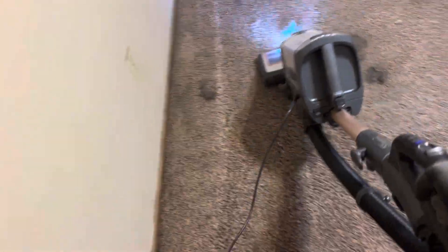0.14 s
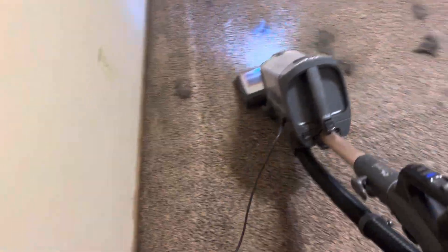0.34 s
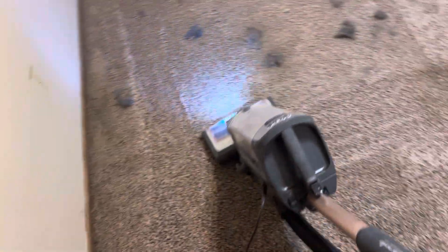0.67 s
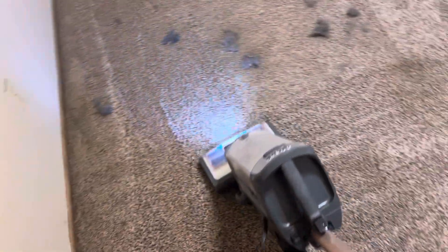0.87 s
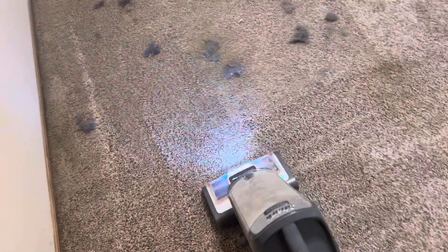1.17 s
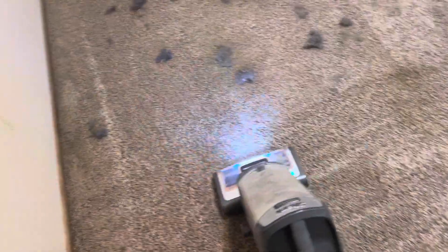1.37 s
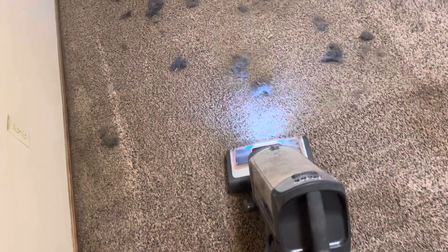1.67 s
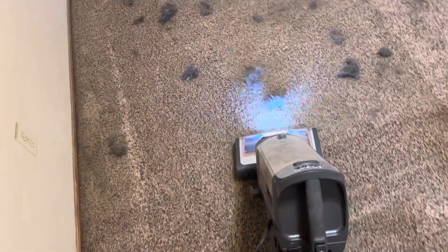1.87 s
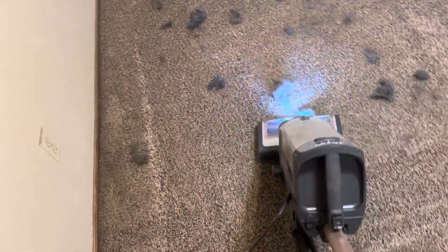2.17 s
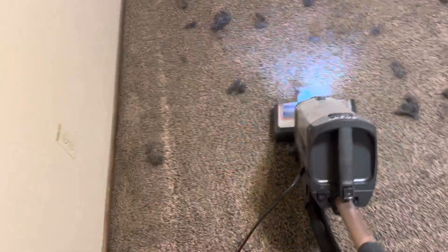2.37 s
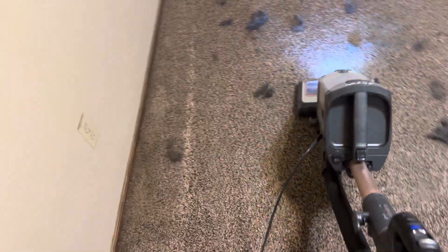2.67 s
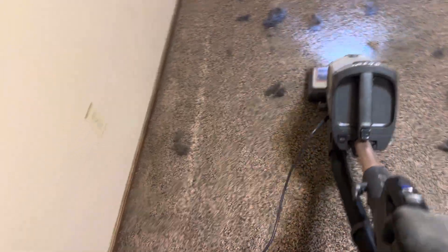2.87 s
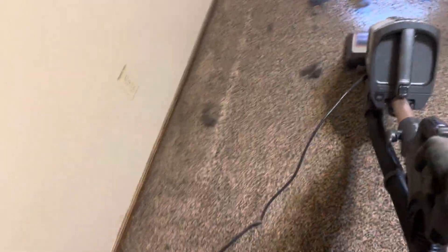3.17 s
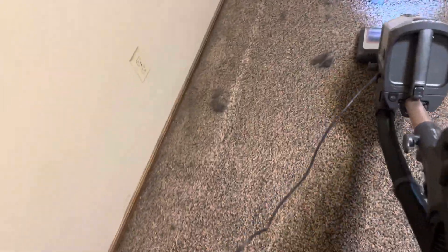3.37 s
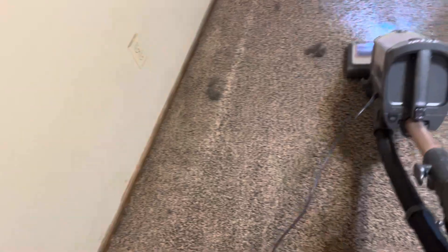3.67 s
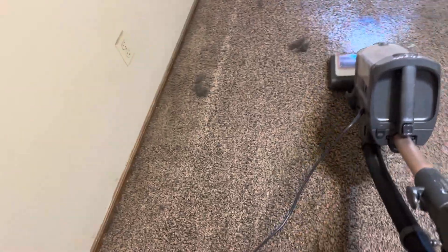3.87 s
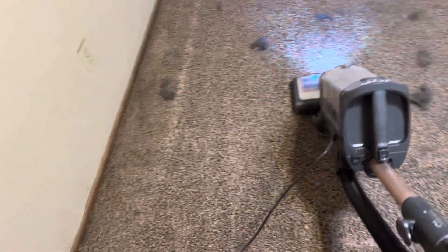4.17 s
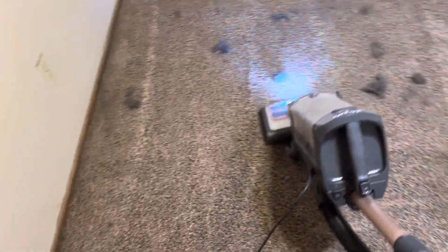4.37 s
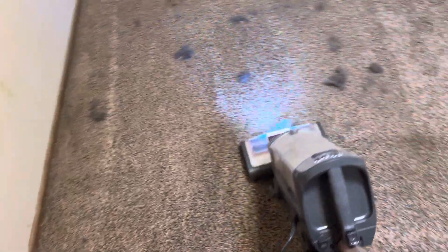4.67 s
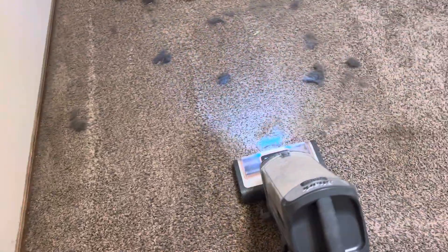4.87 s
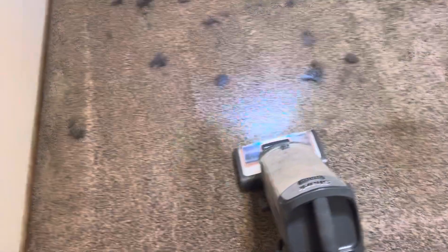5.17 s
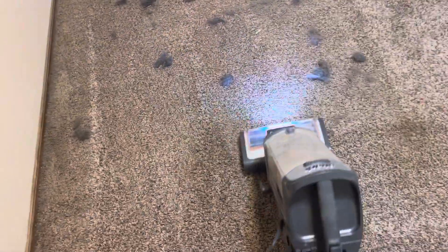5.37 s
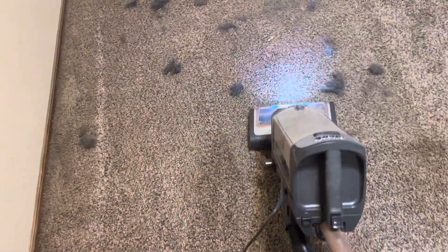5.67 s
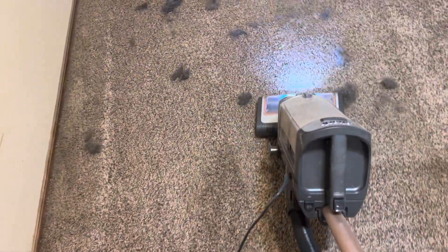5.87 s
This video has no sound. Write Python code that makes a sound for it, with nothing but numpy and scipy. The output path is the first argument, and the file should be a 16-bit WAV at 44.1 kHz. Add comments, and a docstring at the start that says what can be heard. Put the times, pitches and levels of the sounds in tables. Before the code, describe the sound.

An upright vacuum cleaner runs without pause in a carpeted room, heard close from above the handle. Its motor howls on one swelling, fading note under a thin whine. Air rumbles and rushes, the brush roll thrums and beats more firmly during two forward pushes, and grit ticks in the duct. Near the middle the exhaust swings round and the hiss becomes brighter and louder, then eases.

```python
"""In a carpeted room, an upright vacuum cleaner is pushed to and fro, heard from just above its handle.
The motor howls on one note that swells and fades, with a thin whine above it and a faint hum below.
The brush roll drones, thrums and beats the carpet: tones locked to its speed. Grit ticks in the duct.
Air rumbles, rushes and hisses as coloured noise, and blows fuzzy notes in the hollow parts.
The strokes of the arm and one swing of the exhaust towards the listener shape the levels."""
import sys
import numpy as np
from scipy import signal
from scipy.fft import next_fast_len
from scipy.io import wavfile
from scipy.ndimage import uniform_filter1d

SR = 44100
rng = np.random.default_rng(int(sys.argv[2]) if len(sys.argv) > 2 else 0)


def to_wav(sig):
    """Store sig (one row per channel, or 1-D mono) as 16-bit WAV at the path in sys.argv[1].

    Samples outside -1..1 are clipped; the rate is SR.
    """
    pcm = np.clip(np.atleast_2d(sig), -1, 1) * 32767
    pcm = np.round(pcm).astype(np.int16)
    wavfile.write(sys.argv[1], SR, pcm.T)  # frames by channels


N = 265923  # length in samples
TIME = np.arange(N) / SR  # seconds


def gain_of(db):
    """Turns decibels into an amplitude factor."""
    return 10 ** (np.asarray(db) / 20)


def evened(x):
    """Scales a signal to an rms of one."""
    return x / np.sqrt(np.mean(abs(x) ** 2) + 1e-20)


def read(points, hz):
    """Reads a table over frequency, joining its points along a log-frequency axis."""
    point_hz, value = np.transpose(points)
    return np.interp(np.log(hz + 1), np.log(point_hz + 1), value)


def curves(rows):
    """Joins the rows of a time table with straight lines: one curve for each column after the time."""
    s, *columns = np.transpose(rows)
    return [np.interp(TIME, s, column) for column in columns]


def swells_db(rows):
    """Adds up brief bell-shaped swells and dips of a level; at the half width a bell is down to 37 %."""
    return sum(db * np.exp(-((TIME - s) / half_width) ** 2) for s, half_width, db in rows)


def angle_of(hz):
    """The running angle, in radians, of something that turns hz times a second."""
    return 2 * np.pi * np.cumsum(hz) / SR


def flutter(width_hz):
    """Slow complex randomness of unit rms, about width_hz wide: a wider band flutters faster."""
    size = next_fast_len(N)
    spectrum = rng.standard_normal(size) + 1j * rng.standard_normal(size)
    hz = np.fft.fftfreq(size, 1 / SR)
    narrowed = spectrum / (1 + (2 * hz / width_hz) ** 2)
    return evened(np.fft.ifft(narrowed)[:N])


def partial(angle, width_hz, steady):
    """A stereo tone: a steady direct part, plus a part that flutters differently left and right."""
    steady = np.clip(steady, 0, 1)
    scattered = np.array([flutter(width_hz), flutter(width_hz)])
    envelope = np.sqrt(steady) + np.sqrt(1 - steady) * scattered
    return np.sqrt(2) * (envelope * np.exp(1j * angle)).real


def patches(shape, frames, bins):
    """A smooth random field of unit rms over frequency and time."""
    field = rng.standard_normal(shape)
    field = uniform_filter1d(field, bins, axis=0)
    return evened(uniform_filter1d(field, frames, axis=1))


# How alike the air sounds left and right. Each row: frequency in Hz, likeness from 0 to 1.
LIKENESS = [(100, .98), (350, .7), (750, .65), (950, .4), (1450, .25), (2000, .5), (2400, .88), (3000, .62),
            (5200, .42), (6400, .5), (7200, .88), (15000, .88)]
# How far the left channel runs ahead of the right. Each row: frequency in Hz, lead in radians.
LEAD = [(100, 0), (800, 0), (1050, .8), (1250, .3), (1550, -3.4), (2000, -4.9), (2250, -6.3), (3000, -7),
        (5100, -7), (5500, -4), (6900, -3.2), (9500, 0), (12600, 3.1), (15600, 6.3)]
# How much louder the left channel is. Each row: frequency in Hz, left minus right in dB.
BALANCE_DB = [(70, 1), (300, -2), (1100, -1.5), (1800, 2), (2500, 0), (3500, -1.8), (5000, -4),
              (6400, -3.5), (7200, 0), (15000, 0)]


def turbulence(colour, patchy_db, drift_db, streak_db=0, size=1024):
    """Stereo coloured noise of unit rms, with quick eddies, slow drift and narrow passing resonances."""
    overlap = size * 3 // 4
    hz, _, (a, b) = signal.stft(rng.standard_normal((2, N)), SR, nperseg=size, noverlap=overlap)
    hz = hz[:, None]
    same = np.clip(read(LIKENESS, hz), 0, 1)
    side_gain = gain_of(read(BALANCE_DB, hz) / 2)
    left = a * np.exp(1j * read(LEAD, hz)) * side_gain
    right = (same * a + np.sqrt(1 - same ** 2) * b) / side_gain
    eddies = patches(a.shape, frames=14, bins=10)
    drift = patches(a.shape, frames=120, bins=3)
    streaks = patches(a.shape, frames=20, bins=1)
    level_db = read(colour, hz) + patchy_db * eddies + drift_db * drift + streak_db * streaks
    field = np.array([left, right]) * gain_of(level_db)
    noise = signal.istft(field, nperseg=size, noverlap=overlap)[1]
    return evened(noise[:, :N])


def cavity(hz, db, width_hz):
    """Air sucked past a cavity blows it like a wide bottle: a fuzzy note."""
    note = flutter(width_hz) * np.exp(1j * angle_of(hz))
    return gain_of(db) * evened(note.real)


# The arm's strokes, one row for each turning point. Each row: time in seconds,
# reach from 0 at the feet to 1 at arm's length, push from 0 to 1 of the stroke that starts here.
STROKES = [(0, 0.54, 0), (1.25, 0.014, 0.75), (3.382, 0.96, 0), (5.12, 0.021, 1), (6.4, 0.45, 0)]
TURN_S = 0.093  # the nozzle takes this long to bed in or ease off after a turn


def strokes():
    """Reach, easing from one turning point to the next, and how firmly the nozzle is pushed."""
    s, reach, push = np.transpose(STROKES)
    points = np.arange(len(s))
    leg = np.interp(TIME, s, points)
    eased = np.floor(leg) + (1 - np.cos(np.pi * (leg % 1))) / 2
    firmness = uniform_filter1d(push[leg.astype(int)], round(TURN_S * SR))
    return np.interp(eased, points, reach), firmness


def stroke_db(law):
    """The level of a sound that depends on the reach and on the push."""
    close_db, reach_db, push_db = law
    reach, push = strokes()
    return close_db + reach_db * reach + push_db * push


FACING_S, SWING_IN_S, SWING_OUT_S, SWING_SHARPNESS = 2.95, 0.64, 0.83, 2.7


def facing():
    """How squarely the exhaust faces the listener (0-1): a quick swing in, then a slower turn away."""
    t = TIME - FACING_S
    swing_in = np.exp(-abs(t / SWING_IN_S) ** SWING_SHARPNESS)
    turn_away = np.exp(-abs(t) / SWING_OUT_S)
    return np.where(t < 0, swing_in, turn_away)


# The brush roll's speed; it slows where it digs into the pile.
# Each row: time in seconds, turns per second.
BRUSH_SPEED = [(0, 75.5), (1.1, 78), (1.3, 72), (1.55, 69), (1.9, 70.3), (2.15, 70), (2.4, 73), (2.7, 74.2),
               (3.15, 72.7), (3.9, 71.5), (4.6, 74.5), (5, 74.5), (5.2, 70.4), (5.55, 69.8), (6.03, 70.6)]
SKIM_HZ, SETTLE_S = 74, 0.67  # faster than this the roll skims the pile; averaging time in seconds


def brush_speed():
    """Turns per second of the brush roll, which sets the pitch of all its tones."""
    return curves(BRUSH_SPEED)[0]


def skimming():
    """By how many turns a second the roll runs free as it loses its grip on the pile."""
    return uniform_filter1d(np.maximum(brush_speed() - SKIM_HZ, 0), round(SETTLE_S * SR))


# Swells of the hum. Each row: time in seconds, half width in seconds, change in dB.
MAINS_SWELLS = [(.48, .11, 10), (.85, .08, 8), (2.55, 0.16, 10.4), (4.42, .1, 6.7)]
MAINS_HZ, MAINS_DB = 118.4, -61  # level between the swells


def mains_hum():
    """Faint mains hum: one low sine, alike on both sides."""
    level_db = MAINS_DB + swells_db(MAINS_SWELLS)
    return gain_of(level_db) * np.sqrt(2) * np.cos(2 * np.pi * MAINS_HZ * TIME)


# Crumbs striking the plastic duct. Each row: time in seconds, strength in dB.
CRUMBS = [(.547, -37), (.574, -33), (.69, -34), (.795, -36), (1.279, -35), (1.493, -36), (2.318, -33),
          (2.571, -31), (3.544, -32), (3.597, -32), (3.613, -30), (3.864, -30), (4.474, -30), (4.485, -34),
          (4.656, -34), (4.674, -33), (5.205, -32), (5.792, -35)]
# Colour of the ticks. Each row: frequency in Hz, dB per Hz.
CRUMB_COLOUR = [(1000, -25), (4000, -8), (9000, -3), (13500, 1), (16000, 0)]
SAND_PER_S, SAND_DB, SAND_SPREAD_DB = 60, -67.0, 4.5  # grains a second, smallest grain, spread of sizes


def grit():
    """Sand and larger crumbs tick in the duct: noise bursts that each die within milliseconds."""
    extra_db = SAND_SPREAD_DB * np.minimum(rng.exponential(1, N), 3)
    strikes = gain_of(SAND_DB + extra_db) * (rng.random(N) < SAND_PER_S / SR)
    for s, db in CRUMBS:
        strikes[round(s * SR)] += gain_of(db)
    decay = np.exp(-1 / (.003 * SR))  # a time constant of 3 ms
    ring = signal.lfilter([1], [1, -decay], strikes)
    return ring * turbulence(CRUMB_COLOUR, patchy_db=2, drift_db=0)


# Swells of the bin's note. Each row: time in seconds, half width in seconds, change in dB.
BIN_SWELLS = [(4.1, 0.56, 10.5), (5.75, 0.31, 10.4)]
BIN_HZ, BIN_DB = 245.4, -54  # level before swells and stereo balance


def dust_bin():
    """A low hollow note, as of the dust bin, blown by the air and alike on both sides."""
    note = cavity(np.full(N, BIN_HZ), BIN_DB + swells_db(BIN_SWELLS), width_hz=33.0)
    return note * gain_of([[-1.7], [.7]])


# The nozzle's note drops out or flares. Each row: time in seconds, half width in seconds, change in dB.
NOZZLE_SWELLS = [(.75, 0.16, 6.5), (2.35, 0.088, -7), (3.52, 0.27, -4.5), (4.2, 0.15, -11), (4.72, 0.45, 3),
                 (5.58, 0.19, -9), (5.84, 0.083, 8)]
NOZZLE_HZ, NOZZLE_SHIFT_HZ = 334.3, 33.26  # pitch when pulled in close, and its rise at full reach
NOZZLE_DB = -39  # before swells and stereo balance


def nozzle():
    """The nozzle's hollow note rises with the reach and is alike on both sides."""
    reach, _ = strokes()
    hz = NOZZLE_HZ + NOZZLE_SHIFT_HZ * reach
    note = cavity(hz, NOZZLE_DB + swells_db(NOZZLE_SWELLS), width_hz=28.5)
    return note * gain_of([[-1.7], [.7]])


# The duct's moan. Each row: time in seconds, pitch in Hz, level in dB before stereo balance.
DUCT = [(0, 1000, -46), (.35, 965, -38), (.7, 1020, -44.5), (1.1, 1045, -41), (2.2, 1070, -45.5),
        (2.8, 955, -53), (3.6, 945, -39), (4.1, 935, -46.5), (4.8, 1020, -41), (5.3, 1090, -43.5),
        (6.03, 1060, -36.5)]


def duct():
    """The air duct moans on a drifting note, scattered by the room so that left and right differ."""
    hz, db = curves(DUCT)
    moan = np.array([cavity(hz, db, width_hz=55), cavity(hz, db, width_hz=55)])
    return moan * gain_of([[-1], [1]])


# The hose's hoot. Each row: time in seconds, pitch in Hz, level in dB.
HOSE = [(0, 1700, -62), (1, 1790, -42), (1.6, 1680, -54), (2, 1430, -47), (2.5, 1287, -39),
        (2.9, 1294, -66), (4.1, 1458, -51), (4.6, 1730, -43.5), (5.35, 2150, -55), (6.03, 1764, -45)]


def hose():
    """A breathy hoot wanders as the hose flexes, scattered so that left and right differ."""
    hz, db = curves(HOSE)
    return np.array([cavity(hz, db, width_hz=140), cavity(hz, db, width_hz=140)])


# Colour of the nozzle's rumble. Each row: frequency in Hz, dB per Hz.
RUMBLE = [(20, -44), (45, -25), (95, -19), (150, -4), (195, -5.5), (250, -7), (305, 1), (370, 1.5),
          (470, -1), (600, -4), (800, -6.5), (1400, -42), (4000, -77)]
# Level when gripping the pile, change per free turn a second, change when the exhaust faces us.
RUMBLE_DB, RUMBLE_SKIM_DB_PER_HZ, RUMBLE_FACING_DB = -35, -0.6, -3.5


def rumble():
    """Low noise at the nozzle thins when it skims, and when the body swings round and hides it."""
    level_db = RUMBLE_DB + RUMBLE_SKIM_DB_PER_HZ * skimming() + RUMBLE_FACING_DB * facing()
    return gain_of(level_db) * turbulence(RUMBLE, patchy_db=1.0, drift_db=0.5)


# Colour of the rush. Each row: frequency in Hz, dB per Hz.
RUSH = [(300, -27.5), (600, -5.5), (800, -4.5), (1000, 1), (1400, -2), (1850, -2.5), (2250, -7.5),
        (2750, -13.5), (3400, -12.5), (4300, -11), (4900, -19.5), (6200, -13), (8000, -30.5), (15000, -43)]
# Level of the rush. In order: dB when pulled in close, dB more at full reach, dB more at full push.
RUSH_LAW = (-33, -1.87, 0.29)


def rush():
    """Air rushes through the body: noise with passing resonances whose level follows the strokes."""
    noise = turbulence(RUSH, patchy_db=1.2, drift_db=.5, streak_db=2.4, size=2048)
    return gain_of(stroke_db(RUSH_LAW)) * noise


# Colour of the hiss, before its treble is beamed. Each row: frequency in Hz, dB per Hz.
HISS = [(1000, -25), (2700, -7), (4400, -1.5), (6500, -1), (7200, -2), (8000, .5), (10000, 0), (12500, -3),
        (14200, -.5), (16000, -2.5)]
# Level of the hiss. In order: dB when pulled in close, dB more at full reach, dB more at full push.
HISS_LAW = (-41.5, 1, -0.43)
# Small swells of the hiss. Each row: time in seconds, half width in seconds, change in dB.
HISS_SWELLS = [(.1, .35, 0), (4.4, 0.45, 1.2), (5.95, 0.26, 2.5)]
HISS_FACING_DB = 10  # louder by this when the exhaust squarely faces the listener


def exhaust():
    """The vent hisses unsteadily and beams its treble: the louder the hiss, the brighter it is."""
    level_db = stroke_db(HISS_LAW) + HISS_FACING_DB * facing() + swells_db(HISS_SWELLS)
    jet = turbulence(HISS, patchy_db=1.1, drift_db=.35)
    hiss = gain_of(level_db + 0.91 * flutter(width_hz=52).real) * jet
    high_pass = signal.butter(2, 9000, "high", fs=SR, output="sos")
    treble = signal.sosfiltfilt(high_pass, hiss)
    beam_db = .2 * (level_db - level_db.mean())
    return hiss + (gain_of(beam_db) - 1) * treble


def notched(x, hz, depth, width_hz):
    """Cancels a share of the band around the moving frequency hz."""
    turn = np.exp(1j * angle_of(hz))
    r = np.exp(-np.pi * width_hz / SR)
    # shift the band down to zero, smooth it there, and shift it back
    smooth = signal.lfilter([1 - r], [1, -r], x / turn)
    band = 2 * (turn * smooth).real
    return x - np.clip(depth, 0, 1) * band


# A gap in the airy noise slides as the body moves.
# Each row: time in seconds, centre in Hz, depth from 0 to 1.
GAP = [(0, 2260, 0.8), (.9, 2400, 0.14), (1.6, 2490, 0.26), (2.4, 2420, .03), (3.3, 2315, .2),
       (3.9, 2300, .65), (4.6, 2400, 0.1), (5.4, 2399, 0.45), (6.03, 2265, 0.1)]
GAP_WIDTH_HZ = 150


def airflow():
    """Rumble, plus the rush and hiss with a sliding gap cut into both."""
    gap_hz, gap_depth = curves(GAP)
    return rumble() + notched(rush() + exhaust(), gap_hz, gap_depth, GAP_WIDTH_HZ)


# The drone swells and sinks. Each row: time in seconds, half width in seconds, change in dB.
DRONE_SWELLS = [(.15, 0.08, 7), (.65, .3, 5), (1.23, .05, 3), (1.45, 0.1, -5), (1.8, 0.14, -6),
                (2.12, 0.043, -4), (2.35, 0.17, 3), (3.25, 0.2, -3.5), (4.35, 0.18, 2), (4.6, .12, -3),
                (5.6, 0.096, 3.5)]
DRONE_DB, SKIM_DB_PER_HZ = -46, -6  # peak level before swells and balance; change per free turn a second


def drone():
    """The unbalanced roll drones once a turn, and fades when it skims the pile."""
    level_db = DRONE_DB + SKIM_DB_PER_HZ * skimming() + swells_db(DRONE_SWELLS)
    wobble = 1 + 0.2 * flutter(width_hz=15).real
    tone = gain_of(level_db) * wobble * np.cos(angle_of(brush_speed()))
    return tone * gain_of([[.4], [-.4]])


# Level of the thrum. In order: dB when pulled in close, dB more at full reach, dB more at full push.
THRUM_LAW = (-48, -8.5, -3.3)
# It surges or dips briefly. Each row: time in seconds, half width in seconds, change in dB.
THRUM_SURGES = [(.36, 0.079, 5), (.72, 0.1, -7), (1.17, 0.09, 5), (1.43, 0.1, -13), (1.88, .17, 3.5),
                (2.36, .07, -5), (2.58, .08, 10), (4.32, 0.12, 4.5), (4.82, .08, 0), (5.08, 0.16, 3)]


def thrum():
    """The roll's two bristle rows thrum twice a turn."""
    level_db = stroke_db(THRUM_LAW) + swells_db(THRUM_SURGES)
    return gain_of(level_db) * partial(2 * angle_of(brush_speed()), width_hz=6.7, steady=0.93)


# Level of the whole beat before stereo balance.
# In order: dB when pulled in close, dB more at full reach, dB more at full push.
BEAT_LAW = (-52.5, 0.78, 12.5)
# Harmonics of the beat. Each row: multiple of the brush speed, dB relative to the beat's level.
BEAT = [(3, -12), (4, -4.5), (5, -4.5), (6, .7), (7, -12), (8, -9), (12, -14), (13, -12), (15, -13)]
# Single harmonics swell and sink.
# Each row: multiple of the brush speed, time in seconds, half width in seconds, change in dB.
BEAT_SWELLS = [(3, 3.1, .7, 4), (4, 1.6, .35, 3.5), (4, 2.8, .14, -9), (4, 3.85, .3, 10),
               (4, 5.3, .17, 5.5), (4, 5.95, .25, -12), (5, 2.9, .3, 4), (5, 4.95, .15, 12),
               (5, 5.4, .25, -6), (6, 1.55, .25, -3), (6, 2.55, .12, 1.5), (6, 3.02, .12, 4),
               (6, 3.47, .1, -10), (6, 5.25, .15, 2), (6, 5.72, .14, 4.5), (7, 2.45, .25, 6),
               (7, 2.95, .15, 5), (8, 3.15, .25, 7), (13, 3.1, .35, 5)]


def bristle_beat():
    """The bristles beat the pile unevenly: harmonics of the brush speed, each with its own swells."""
    angle = angle_of(brush_speed())
    beat = 0
    for multiple, db in BEAT:
        own_swells = [row[1:] for row in BEAT_SWELLS if row[0] == multiple]
        level_db = db + swells_db(own_swells)
        beat = beat + gain_of(level_db) * partial(multiple * angle, width_hz=9, steady=.9)
    return gain_of(stroke_db(BEAT_LAW)) * beat * gain_of([[-1], [1.2]])


# The motor shaft's speed. Each row: time in seconds, turns per second.
SHAFT = [(0, 662.2), (.85, 663.1), (1.85, 663), (2.25, 661.7), (2.85, 663.7), (3.7, 661.5), (4.3, 662.1),
         (6.03, 662.2)]


def shaft_angle():
    """The running angle of the motor shaft, which sets the pitch of howl and whine."""
    return angle_of(curves(SHAFT)[0])


# Blade tones of the fan. Each row: multiple of the shaft speed, level in dB before the lift and swells,
# width of its flutter in Hz, steady share from 0 to 1.
WHINE = [(2, -62, 10, .4), (4.397, -65.5, 14, .3), (8, -57.3, 24, .4), (16, -60.5, 42, .25)]
# The whine flares and fades. Each row: time in seconds, half width in seconds, change in dB.
WHINE_SWELLS = [(0, .1, -5), (.48, .07, -8), (.65, .08, 2), (.88, .06, -3), (1.14, .11, 3.5),
                (1.36, .07, 4), (1.75, .09, 4), (2.1, .11, -12), (2.95, .15, 2), (2.55, .2, -2),
                (3.3, .15, -4), (3.85, .05, -6), (4.22, .08, -3), (4.45, .07, 2), (4.83, .06, -5),
                (4.98, .07, 4.5), (5.15, .07, -4), (5.65, .06, 4), (5.8, .06, -4), (5.98, .08, 2.5)]
WHINE_LIFT_DB = 4  # added to every blade tone


def whine():
    """The fan's blade tones whine thinly above the shaft note and flutter."""
    angle = shaft_angle()
    tones = sum(gain_of(db) * partial(multiple * angle, width_hz, steady)
                for multiple, db, width_hz, steady in WHINE)
    level_db = WHINE_LIFT_DB + swells_db(WHINE_SWELLS)
    return tones * gain_of(level_db) * gain_of([[-1.5], [1.5]])


# The shaft note drifts between left and right. Each row: time in seconds, left level in dB,
# right level in dB (both before the dips below), lead of the left channel in radians.
HOWL = [(0, -29.5, -21.5, 1.3), (.24, -20.3, -23.5, -1.45), (.43, -26.5, -18.5, -1.5),
        (.58, -19.5, -18, 0.27), (.9, -20.4, -21.5, .5), (1.2, -21.5, -22.1, .4), (1.75, -20, -20.5, .8),
        (2.05, -24, -18, 0.35), (2.2, -24.5, -20.5, 0), (2.52, -20.5, -22, .2), (2.75, -23.5, -18, 0.6),
        (3, -22.3, -18.5, -0.6), (3.25, -25, -20, -.8), (3.53, -28, -17.5, 0.4), (3.97, -23.5, -24, -1),
        (4.33, -27.5, -26.5, -1.75), (4.52, -27.2, -22.5, -1.95), (4.68, -28.9, -20, -1.2),
        (5.05, -33, -20, -1.7), (5.35, -36.5, -17.5, -3.5), (5.72, -43, -20, -5.1), (5.83, -32, -22, -6.5),
        (5.97, -26.5, -20, -5.5)]
# The note sinks as a node of the room's standing wave passes.
# Each row: time in seconds, half width in seconds, change in dB.
NODES = [(.327, 0.032, -8.5), (2.33, 0.044, -6), (4.185, 0.067, -7.5)]
HOWL_ECHO_DB, HOWL_ECHO_WIDTH_HZ = -47, 21  # level and flutter width of the scattered note


def howl():
    """The shaft note, trembling with the housing; a little is scattered by the room and flutters."""
    angle = shaft_angle()
    left_db, right_db, lead = curves(HOWL)
    left = gain_of(left_db) * np.cos(angle + lead)
    right = gain_of(right_db) * np.cos(angle)
    direct = np.array([left, right]) * gain_of(swells_db(NODES))
    tremble = 1 + 0.064 * flutter(width_hz=150).real
    echo = gain_of(HOWL_ECHO_DB) * partial(angle, HOWL_ECHO_WIDTH_HZ, steady=0)
    return np.sqrt(2) * direct * tremble + echo


def scene():
    """The whole machine at work, summed from the background to the howl of the motor."""
    hollow_notes = dust_bin() + nozzle() + duct() + hose()
    brush_roll = drone() + thrum() + bristle_beat()
    motor = mains_hum() + whine() + howl()
    return grit() + hollow_notes + airflow() + brush_roll + motor


EDGE_HZ = 15800  # little is left above this


def record(dry):
    """The recorder's band limit: a steep low-pass filter."""
    low_pass = signal.firwin(511, EDGE_HZ, window=("kaiser", 9), fs=SR)
    return signal.oaconvolve(dry, low_pass[None], "same")


dry = scene()
out = record(dry)
to_wav(out)
```